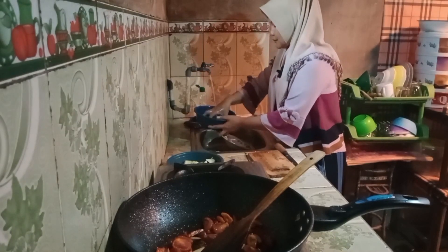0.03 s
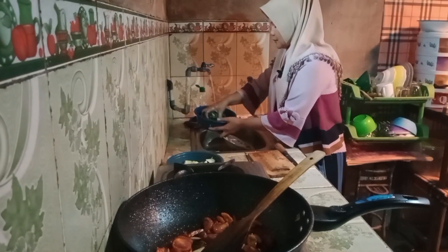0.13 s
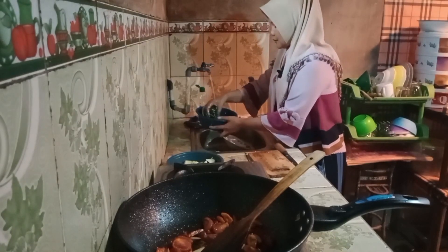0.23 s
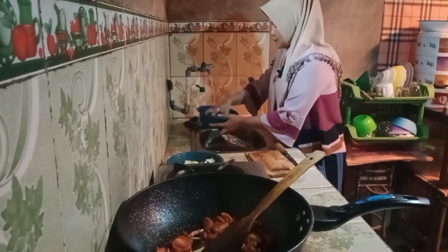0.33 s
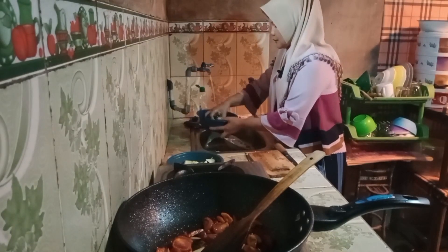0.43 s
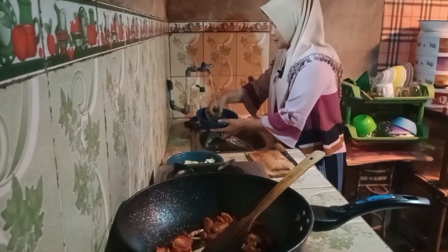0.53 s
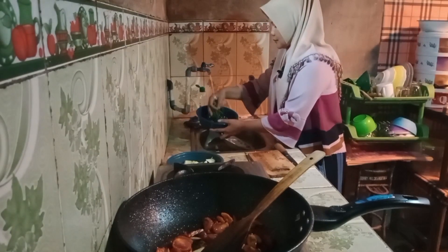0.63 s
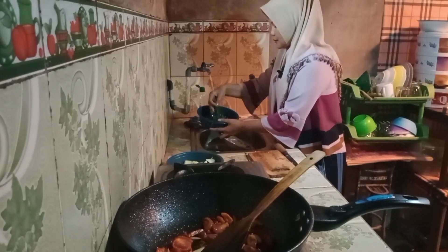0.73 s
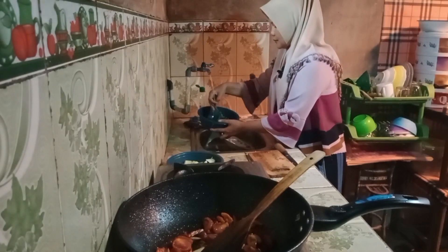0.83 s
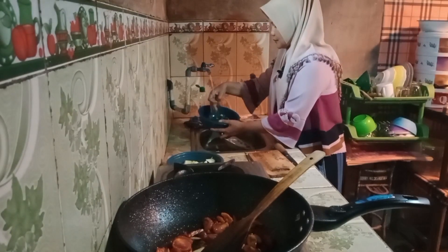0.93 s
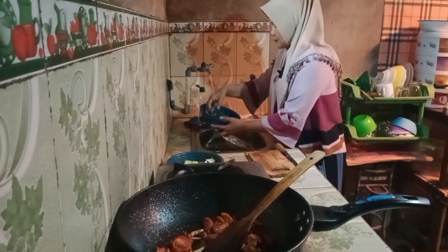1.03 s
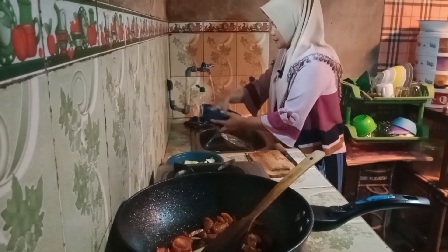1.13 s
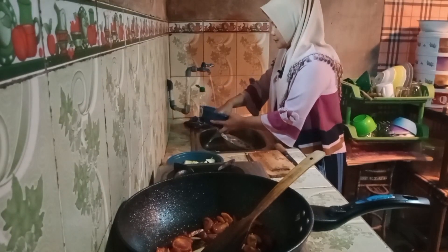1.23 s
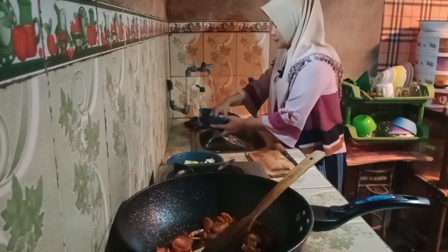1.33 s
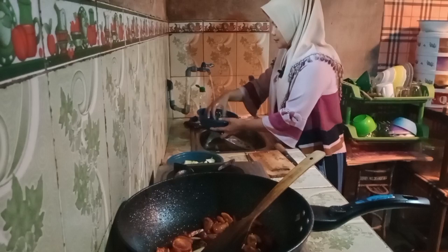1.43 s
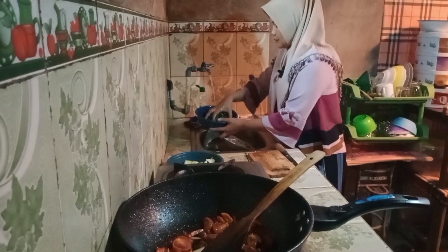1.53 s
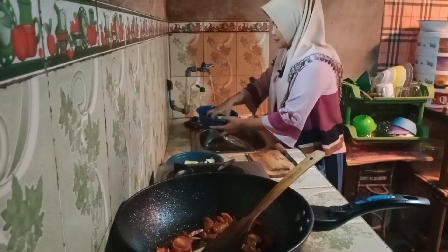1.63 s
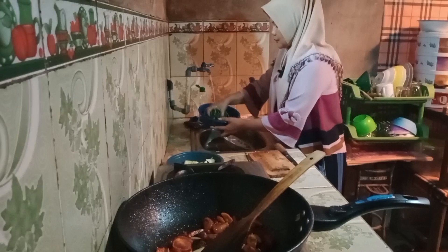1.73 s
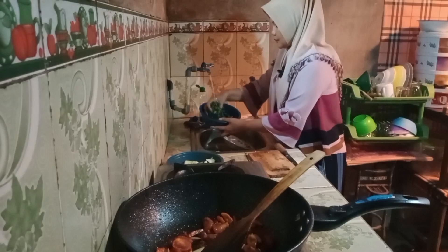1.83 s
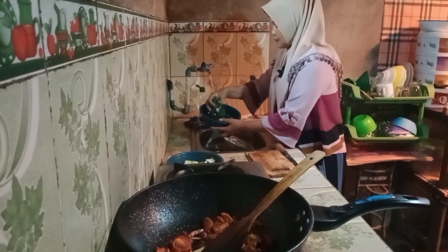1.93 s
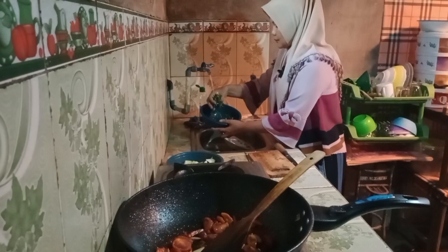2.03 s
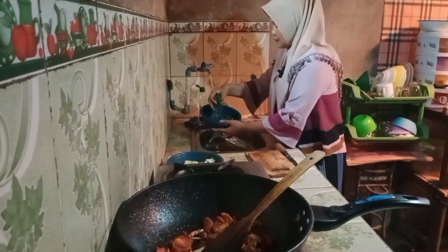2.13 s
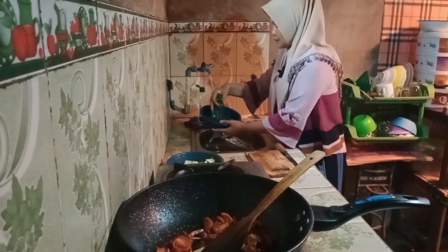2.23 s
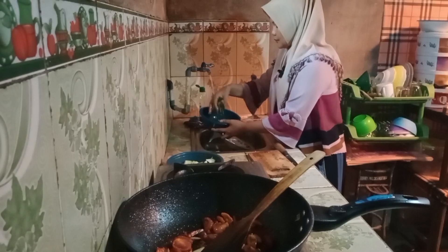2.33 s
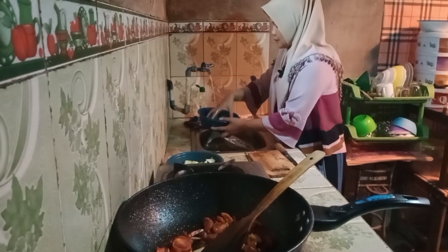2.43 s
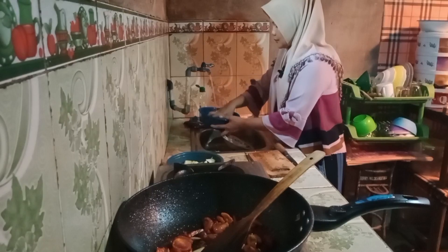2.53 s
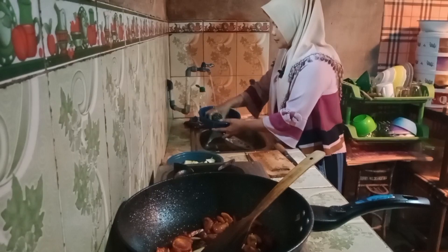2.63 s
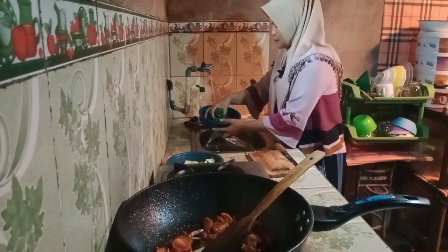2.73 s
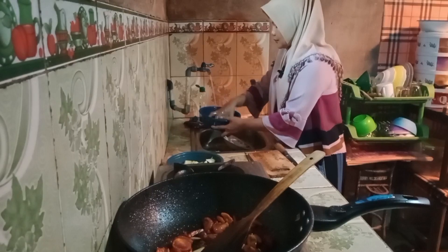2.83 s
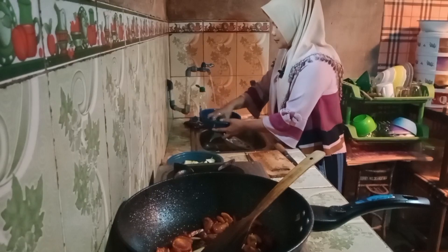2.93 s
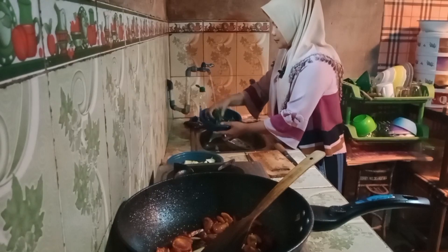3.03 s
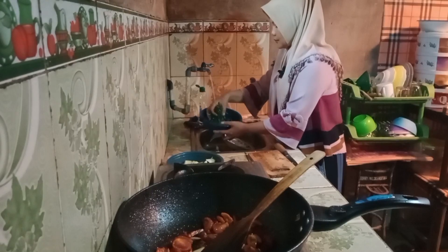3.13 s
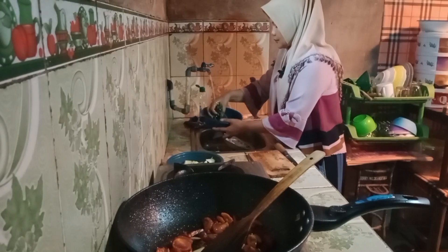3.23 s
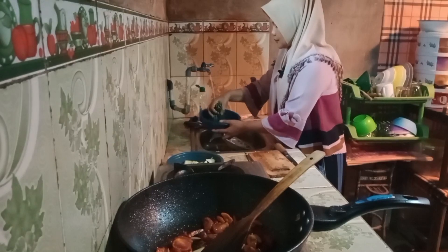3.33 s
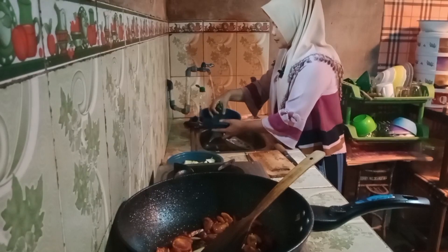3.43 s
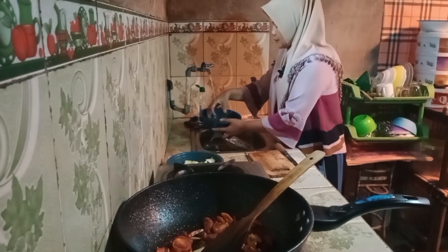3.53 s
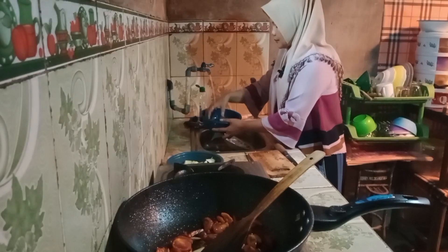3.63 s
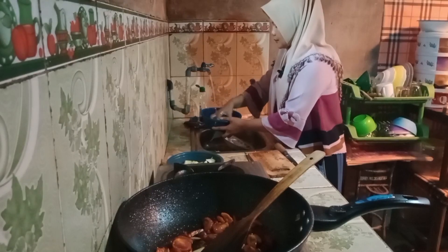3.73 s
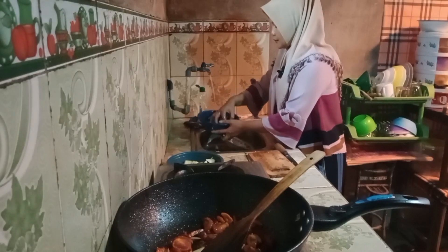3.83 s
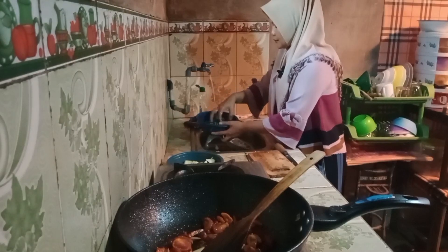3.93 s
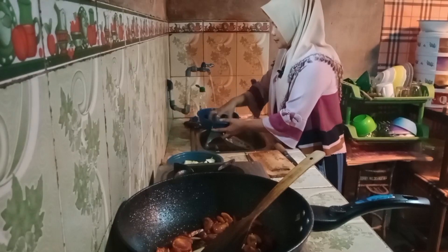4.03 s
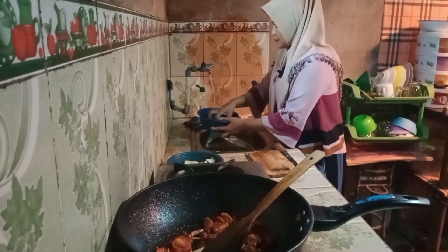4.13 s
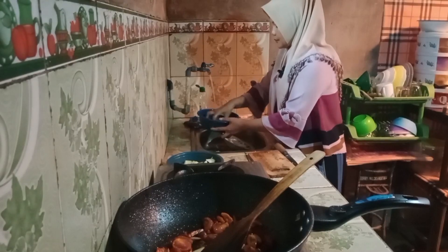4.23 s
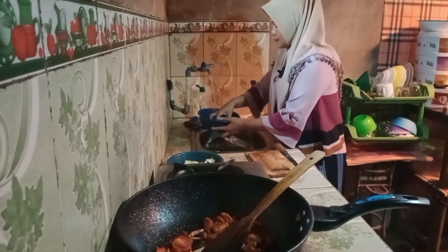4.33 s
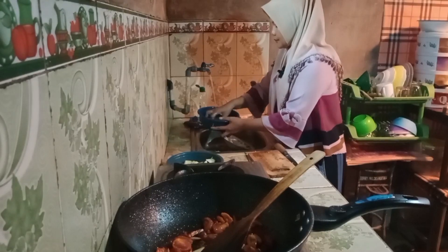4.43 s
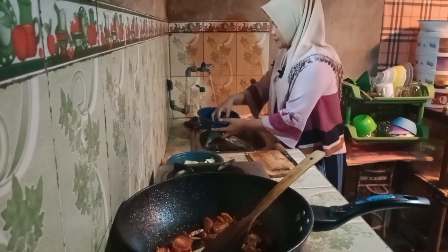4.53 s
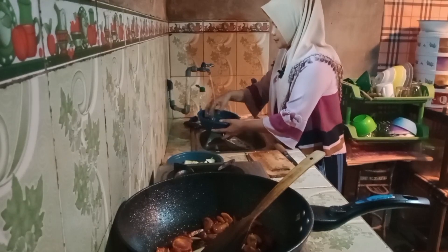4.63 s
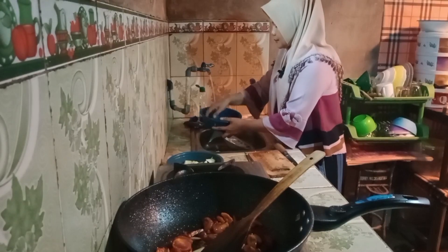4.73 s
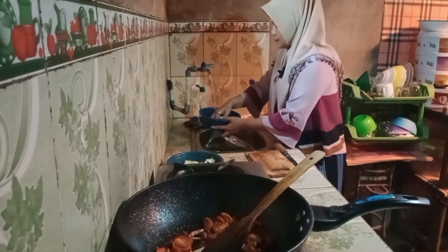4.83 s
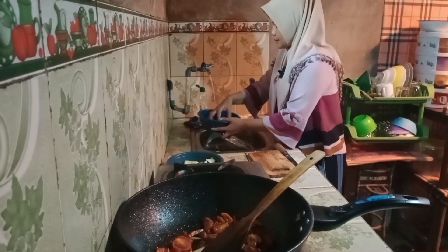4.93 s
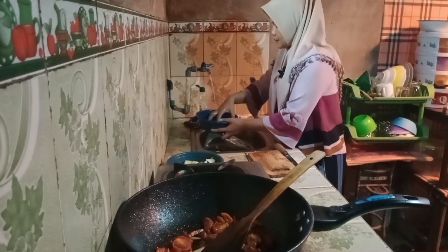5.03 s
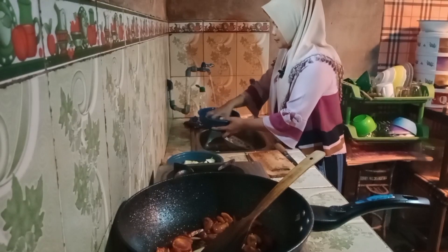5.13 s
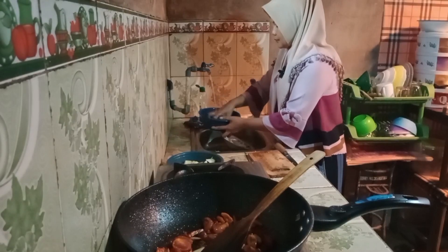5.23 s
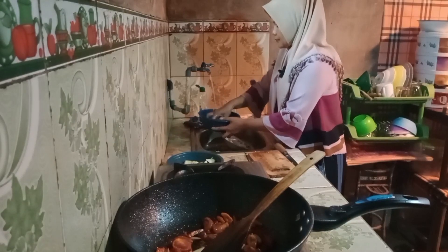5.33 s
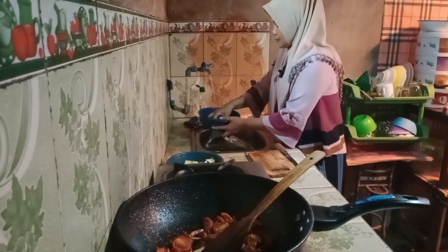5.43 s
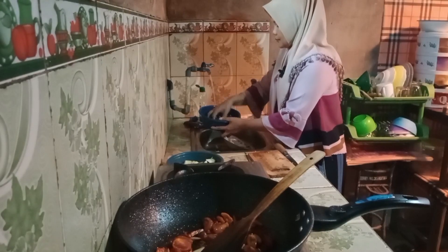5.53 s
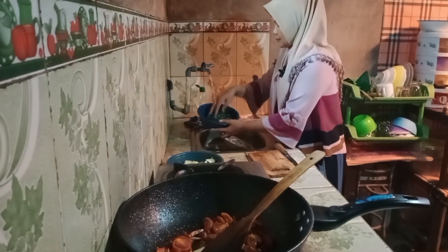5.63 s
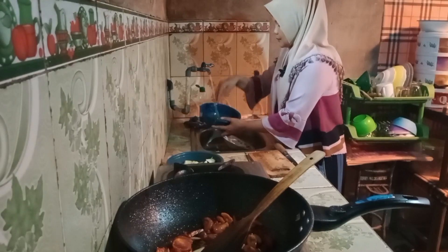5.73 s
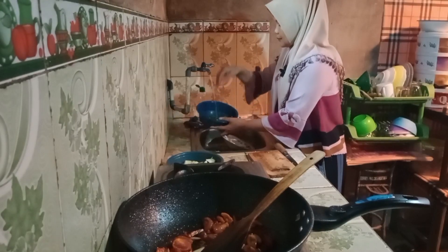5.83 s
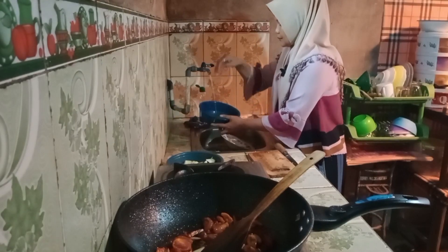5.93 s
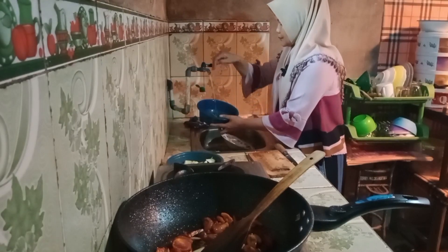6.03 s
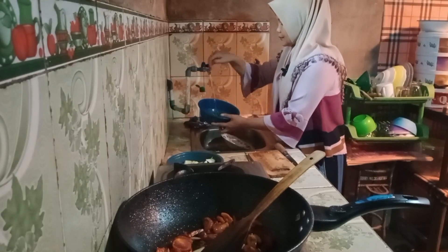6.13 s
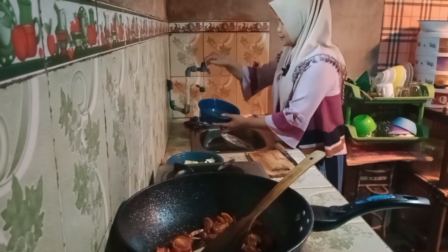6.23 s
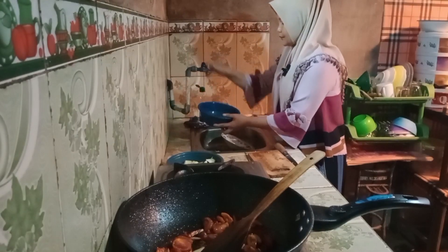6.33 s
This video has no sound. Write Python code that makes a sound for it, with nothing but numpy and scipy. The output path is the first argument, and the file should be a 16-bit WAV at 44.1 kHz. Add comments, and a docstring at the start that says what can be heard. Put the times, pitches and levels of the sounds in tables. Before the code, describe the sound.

Vegetables are washed by hand in a plastic bowl over a metal sink. Quick hollow knocks, gurgling rubs and plops come densely at first, then in looser bursts with small splashes and soft low booms from the sink. After four seconds the water is tipped out in several gushes, the first hissing on steel. A few faint drips end it. Close-sounding, small tiled room with short bright echo.

```python
"""Vegetables are washed by hand in a plastic bowl over a steel sink in a small tiled kitchen.
Skins stick and slip (clicks, gurgles) and knock (thuds, plops) on the bowl, whose modes ring on.
Water is swarms of bubbles and ticks, with slaps, drips and squirts between the fingers; wet skin whistles.
The sink booms softly when pressed: noise through its lowest modes. Towards the end the water is tipped
out in a few gushes, the first of which hisses on the steel. Tile echo and faint room noise surround it."""
import sys
import numpy as np
from scipy import signal
from scipy.fft import rfft, irfft
from scipy.io import wavfile
from scipy.ndimage import uniform_filter1d, map_coordinates

SR = 44100
rng = np.random.default_rng(int(sys.argv[2]) if len(sys.argv) > 2 else 0)


def wav_record(signal):
    """Record a signal, one row per channel, as 16-bit PCM in the file named by sys.argv[1]."""
    frames = np.transpose(np.atleast_2d(signal))
    bounded = np.clip(frames, -1, 1)
    # unit amplitude maps onto the largest positive 16-bit level
    quanta = np.round(bounded * 32767).astype(np.int16)
    wavfile.write(sys.argv[1], SR, quanta)


N = 281799
TIME = np.arange(N) / SR
BINS_HZ = np.fft.rfftfreq(4096, 1 / SR)

# Strokes of the hand round the bowl. Each row: start in seconds, length in seconds,
# relative rubbing level in dB, relative splash level in dB, air pocket pitch in Hz.
STROKES = [(0, 0.013, -17, -39.5, 669), (0.085, 0.28, -25.5, -51.5, 676), (0.16, 0.18, -19.5, -42, 641),
           (0.374, 0.38, -30.5, -59, 611.4), (0.504, 0.17, -22, -43, 580),
           (0.821, 0.087, -41.5, -59.5, 670), (0.933, 0.083, -28, -46.5, 710),
           (1.285, 0.15, -46, -46.5, 702), (1.431, 0.029, -37, -55, 585), (1.554, 0.072, -43, -77, 486),
           (1.66, 0.039, -33, -52, 930), (1.765, .13, -37, -58, 850), (1.887, 0.072, -38.5, -43.5, 622),
           (2.071, 0.031, -42.5, -62, 708), (2.186, 0.11, -32.5, -51.5, 670),
           (2.416, 0.087, -23.5, -46, 643), (2.642, 0.093, -29, -41.5, 690), (2.74, 0.12, -27, -38, 748),
           (2.874, 0.041, -31, -51.5, 690), (3.055, 0.066, -31.5, -45, 750), (3.114, 0.11, -26.5, -36, 764),
           (3.278, .1, -38.5, -49, 480), (3.357, 0.12, -33, -54.5, 507), (3.565, 0.029, -24.5, -41.5, 720),
           (3.622, 0.13, -50, -51, 655), (3.793, 0.037, -47.5, -49.5, 627), (3.906, 0.22, -48.5, -57, 650),
           (4.16, 0.33, -52.5, -53.5, 656)]
# Gushes as the bowl is tipped out. Each row: start in seconds, length in seconds, relative gurgling level
# in dB, relative splash level in dB, air pocket pitch in Hz, relative spray level in dB.
GUSHES = [(4.268, .1, -40.5, -37.5, 950, -37.5), (4.378, 0.21, -34.5, -36.5, 542, -46.5),
          (4.612, 0.12, -40, -35.5, 948, -48.5), (4.776, 0.069, -50.5, -59, 767, -73),
          (4.926, 0.096, -47, -55, 690, -57.5), (5.054, 0.034, -47, -47.5, 707, -56.5),
          (5.255, 0.147, -28.5, -37.5, 972, -49.5), (5.44, 0.092, -36, -41, 690, -56.5),
          (5.604, 0.066, -44, -48, 840, -58)]
# Spectrum of a blow on the bowl. Each row: frequency in Hz, relative level in dB.
THUD = [(60, -37.5), (150, -25.5), (280, -13), (400, -6.5), (660, -1), (950, -3.5), (1200, -13),
        (1550, -29), (2150, -24.5), (3000, -63.5), (4500, -100), (12000, -83)]
# Spectrum of splashing water. Each row: frequency in Hz, relative level in dB.
SPLASH = [(150, -7.5), (500, -2), (1100, 5), (1600, 3), (2200, 8.5), (2800, -3), (3700, -21), (5000, -32.5),
          (9000, -48), (16000, -64.5)]
# Spectrum of fine spray. Each row: frequency in Hz, relative level in dB.
SPRAY = [(1200, -22), (3000, 7), (4500, 5), (7200, 3), (9000, -6.5), (12000, -6), (15500, -4.5)]


def gain_of(db):
    """Decibels to an amplitude factor."""
    return 10 ** (np.asarray(db) / 20)


def evened(x):
    """Scales to rms 1."""
    return x / np.sqrt(np.mean(x ** 2) + 1e-20)


def steadied(x, size):
    """Unit power over stretches of about size samples; the finer grain stays."""
    power = uniform_filter1d(uniform_filter1d(x ** 2, size), size // 2)
    return x / np.sqrt(abs(power) + np.mean(x ** 2) / 1000)


def read(points, hz):
    """Interpolates a spectrum table on a log-frequency axis."""
    f, value = np.transpose(points)
    return np.interp(np.log(hz + 1), np.log(f + 1), value)


def track(curve, column):
    """One column of a curve, interpolated for every sample."""
    rows = np.array(curve)
    return np.interp(TIME, rows[:, 0], rows[:, column])


def add(mix, s, sound):
    """Adds a sound at s seconds, cut at the scene's end."""
    part = mix[max(round(s * SR), 0):][:len(sound)]
    part += sound[:len(part)]


def through(x, taps):
    """Convolves and keeps the scene's length."""
    return signal.oaconvolve(x, taps)[:N]


def pulse(spectrum, shift=1):
    """Minimum-phase pulse with this spectrum moved up by a factor; peak 1."""
    log_gain = np.log(gain_of(read(spectrum, BINS_HZ / shift)))
    circle = np.concatenate([log_gain, log_gain[-2:0:-1]])
    min_phase = np.exp(np.conj(signal.hilbert(circle)))
    taps = np.fft.ifft(min_phase).real[:len(BINS_HZ)]
    return taps / abs(taps).max()


def resonate(x, hz, width_hz):
    """One-pole resonance of gain 1, run at baseband, at a fixed or moving pitch."""
    turn = np.exp(2j * np.pi * np.cumsum(hz * np.ones(len(x))) / SR)
    r = np.exp(-np.pi * width_hz / SR)
    baseband = signal.lfilter([1 - r], [1, -r], x / turn + 1e-18)
    return 2 * (turn * baseband).real


def drifting(x, depth_db, frames=9, size=3):
    """The hands keep changing the hollows the sound comes from: broad bands swell and fade at random."""
    hz, t, z = signal.stft(x, SR, nperseg=512)
    field = rng.standard_normal((64, len(t)))
    field = uniform_filter1d(field, size, 0)
    field = evened(uniform_filter1d(field, int(frames), 1))
    band = np.clip(7 * np.log2(1 + hz / 100), 0, 63)
    grid = np.meshgrid(band, np.arange(len(t)), indexing="ij")
    field = map_coordinates(field, grid, order=1)
    return signal.istft(z * gain_of(depth_db * field), SR, nperseg=512)[1][:N]


def movements(rows, column, attack_s, sag_db_per_s, release_db_per_s, lapping_db):
    """Level of a run of movements: each swells, sags while it lasts, dies quickly, leaves the water lapping."""
    lapping_db_per_s = 37.5
    t, power = TIME[::64], 0
    for row in rows:
        age = np.maximum(t - row[0], 0)
        after = np.maximum(age - row[1], 0)
        main = gain_of(-sag_db_per_s * age - release_db_per_s * after)
        lapping = gain_of(lapping_db - lapping_db_per_s * age)
        swell = np.minimum(age / attack_s, 1)
        power = power + (gain_of(row[column]) * swell * np.maximum(main, lapping)) ** 2
    return np.interp(TIME, t, np.sqrt(power))


def clicks(per_s, spread_db):
    """Random clicks of either sign: many small, a few large."""
    size = gain_of(spread_db * np.minimum(rng.exponential(1, N), 4))
    return size * rng.choice([-1, 1], N) * (rng.random(N) < per_s / SR)


def bubble(hz, cycles, rise):
    """A trapped air pocket decays by 1/e in this many cycles at hz and rises in pitch as it surfaces."""
    age = np.arange(0, 6, hz / (cycles * SR))  # in decay times
    phase = 2 * np.pi * cycles * (age + rise * age ** 2 / 2)
    return np.exp(-age) * np.sin(phase) / np.sqrt(len(age))


def plink(hz, cycles, rise):
    """One clear bubble that swells over its first cycle; peak 1."""
    ring = bubble(hz, cycles, rise)
    cycle = np.minimum(np.arange(len(ring)) * hz / SR, 1)
    ring = ring * np.sin(np.pi / 2 * cycle) ** 2
    return ring / abs(ring).max()


def water(low_hz, high_hz, per_s, spread_db, cycles, rise, tick_share):
    """A swarm of bubbles, each of its own size, among the sharp ticks of landing drops."""
    swarm = np.zeros(N)
    for s, pitch, rarity, ring, side in rng.random((round(per_s * N / SR), 5)):
        size = np.sign(side - .5) * gain_of(spread_db * min(-np.log(1 - rarity), 4))
        hz = low_hz * (high_hz / low_hz) ** pitch
        add(swarm, s * N / SR, size * bubble(hz, cycles * (0.16 + 3.9 * ring), rise))
    return evened(swarm) + tick_share * evened(clicks(per_s, spread_db))


def pocket_pitch():
    """The air pocket in the water glides from the pitch of one movement to that of the next."""
    return track([(row[0] + row[1] / 2, row[4]) for row in STROKES + GUSHES], column=1)


def rubbing(slips_per_s, spread_db, pocket_width_hz, pocket_db):
    """Skins stick and slip on wet plastic among gurgling bubbles; the air pocket under the hand colours both."""
    gurgle = water(358.8, 1150, per_s=100, spread_db=3, cycles=6.5, rise=0.045, tick_share=0)
    slips = through(evened(clicks(slips_per_s, spread_db)), pulse(THUD))
    gurgle = through(gurgle, pulse(THUD))
    slosh = evened(slips) + gain_of(-1.5) * evened(gurgle)
    slosh = drifting(slosh, depth_db=6.0, frames=6)
    hz = pocket_pitch()
    pocket = resonate(resonate(slosh, hz, pocket_width_hz), hz, pocket_width_hz)
    effort = movements(STROKES + GUSHES, column=2, attack_s=0.01, sag_db_per_s=18.5,
                       release_db_per_s=295, lapping_db=-19.5)
    return steadied(slosh + gain_of(pocket_db) * pocket, size=1500) * effort


def bowl(x, ring_db):
    """The bowl and basin ring on after each touch, as a bank of decaying modes."""
    # Each row: frequency in Hz, 60 dB decay time in seconds, relative level in dB.
    bowl_modes = [(300, 0.28, -8), (391.6, 0.2, 4.5), (480, 0.16, 4), (746, .16, -15), (958, 0.15, 4.5),
                  (1006.5, 0.062, -2.5), (1271.4, 0.14, 3)]
    ring = 0
    for hz, t60_s, db in bowl_modes:
        width_hz = np.log(1000) / np.pi / t60_s
        ring = ring + gain_of(db) * resonate(x, hz, width_hz)
    return x + gain_of(ring_db) * ring


def splashing():
    """Churned bubbles and drops, coloured by the cupped hand in a stroke and open in a gush."""
    # Colour of the cupped hand. Each row: frequency in Hz, relative level in dB.
    cupped = [(300, 8), (900, -2.5), (1550, -5.5), (2200, -2), (2800, -0.5), (3900, -2), (7000, 0)]
    swarm = water(700, 3800, per_s=1500, spread_db=4.0, cycles=5.8, rise=0.03, tick_share=1.0)
    swarm = drifting(through(swarm, pulse(SPLASH)), depth_db=4.5)
    thrown = movements(STROKES, column=3, attack_s=0.038, sag_db_per_s=23.0,
                       release_db_per_s=259.5, lapping_db=-21)
    poured = movements(GUSHES, column=3, attack_s=0.016, sag_db_per_s=26.5,
                       release_db_per_s=319, lapping_db=-27.5)
    in_hand = steadied(through(swarm, pulse(cupped)), size=1600)
    return in_hand * thrown + steadied(swarm, size=1600) * poured


def squirts(swarm):
    """Each squirt is a short puff of fine bubbles, pitched by the gap between the fingers."""
    # Each row: start in seconds, length in seconds, relative level in dB, brightest pitch in Hz.
    squirt_rows = [(0, 0.017, -62, 6430), (0.54, 0.096, -52.5, 2400), (0.713, 0.12, -64.5, 6470),
                   (1.277, 0.071, -61, 7350), (1.306, 0.088, -54, 2950), (1.86, 0.07, -53, 4060),
                   (2.048, 0.036, -48.5, 6600), (2.185, 0.18, -69, 5450), (2.692, 0.12, -52, 5400),
                   (3.062, 0.12, -68, 5500), (3.283, 0.086, -70.5, 7000), (3.288, 0.08, -53.5, 2520),
                   (3.748, 0.049, -67, 8740), (3.836, 0.094, -64.5, 8200), (3.9, 0.039, -57, 4330),
                   (4.005, 0.026, -49, 3600), (4.203, 0.042, -44, 3600), (4.23, 0.12, -50, 7000),
                   (4.393, 0.068, -58.5, 6900), (4.545, 0.18, -63.5, 6540), (4.602, .04, -54, 4100),
                   (4.786, 0.041, -68, 6500), (4.957, 0.048, -61, 5000), (5.232, .12, -52.5, 3030),
                   (6.315, .03, -72, 6000)]
    width_octaves, skirt_db, usual_hz = .33, -15.5, 7000
    out, bins_hz = np.zeros(N), np.fft.rfftfreq(SR // 2, 1 / SR)
    for row in squirt_rows:
        start_s, hz = row[0], row[3]
        first = max(round(start_s * SR), 0)
        # low-pitched squirts carry less fine mist
        mist = gain_of(skirt_db) * (hz / usual_hz) ** 2 * gain_of(read(SPRAY, bins_hz))
        peak = np.exp(-.5 * (np.log2((bins_hz + 1) / hz) / width_octaves) ** 2)
        puff = irfft(rfft(swarm[first:], SR // 2) * (mist + peak), SR // 2)
        puff = steadied(puff, size=2000)
        force = movements([row], column=2, attack_s=0.029, sag_db_per_s=16,
                          release_db_per_s=278, lapping_db=-27)
        force = force[first:][:len(puff)]
        add(out, start_s, puff[:len(force)] * force)
    return out


def spraying(hiss_db):
    """Fine spray squirts, strokes leave a little froth, gushes throw coarser drops over a dense hiss."""
    # Coarser drops of a gush. Each row: frequency in Hz, relative level in dB.
    coarse_spectrum = [(1200, -11.5), (2800, 8), (3900, 5.5), (5500, -11.5), (7500, -7.5), (9500, -21),
                       (15500, -36.5)]
    swarm = water(2600, 14000, per_s=900, spread_db=2.5, cycles=7.7, rise=.012, tick_share=1.0)
    swarm = evened(drifting(swarm, depth_db=4.5, frames=10))
    fine = steadied(through(swarm, pulse(SPRAY)), size=2400)
    hissing = swarm + gain_of(hiss_db) * rng.standard_normal(N)
    coarse = steadied(through(hissing, pulse(coarse_spectrum)), size=2400)
    froth = gain_of(-26.0) * movements(STROKES, column=3, attack_s=0.02, sag_db_per_s=11.0,
                                       release_db_per_s=121.5, lapping_db=-21)
    poured = movements(GUSHES, column=5, attack_s=0.023, sag_db_per_s=56.5,
                       release_db_per_s=283, lapping_db=-33.5)
    return squirts(swarm) + fine * froth + coarse * poured


def squeaks(width_hz):
    """Wet skin and squeezed air whistle: noise through a narrow resonance that glides in pitch."""
    # Each row: start in seconds, length in seconds, start pitch in Hz, end pitch in Hz, level in dB.
    squeak_rows = [(0, 0.21, 3310, 2710, -60), (0.814, 0.13, 2400, 2300, -57.5),
                   (1.082, .16, 3510, 3920, -61.5), (1.742, 0.31, 890, 976, -38),
                   (1.914, 0.11, 850, 480, -41), (2.972, 0.13, 960, 930, -42),
                   (3.952, 0.15, 5930, 5160, -60.5)]
    out = np.zeros(N)
    for s, length_s, start_hz, end_hz, db in squeak_rows:
        hiss = rng.standard_normal(SR)[:int(length_s * SR)]
        hz = np.linspace(start_hz, end_hz, len(hiss))
        tone = resonate(resonate(hiss, hz, width_hz), hz, width_hz)
        add(out, s, gain_of(db) * evened(tone) * np.hanning(len(tone)))
    return out


def boom(hz, width_hz, rumble_db, upper_hz=152, upper_db=-21):
    """The two lowest modes of the sink floor, over a dull rumble of handling."""
    # The hands lean on the bowl and the sink flexes.
    # Each row: start in seconds, length in seconds, level in dB.
    presses = [(.89, .24, -48.5), (1.615, .22, -35), (2.27, .2, -41.5), (2.62, 0.039, -38.5),
               (2.875, .11, -35), (3.02, 0.11, -39), (3.125, 0.074, -32.5), (3.71, .09, -46.5),
               (3.87, 0.11, -41.5), (4.6, 0.11, -45)]
    # the weight of the bowl keeps the sink stirring until it is lifted
    resting_db, lift_s, lift_db_per_s = -59, 5.44, 33.5
    tone = resonate(resonate(rng.standard_normal(N), hz, width_hz), hz, width_hz)
    tone = steadied(tone, size=3000)
    upper = evened(resonate(resonate(rng.standard_normal(N), upper_hz, 26), upper_hz, 26))
    lowpass = signal.butter(3, 72, fs=SR, output="sos")
    rumble = evened(signal.sosfilt(lowpass, rng.standard_normal(N)))
    resting = gain_of(resting_db - lift_db_per_s * np.maximum(TIME - lift_s, 0))
    pressing = movements(presses, column=2, attack_s=0.065, sag_db_per_s=4.0,
                         release_db_per_s=232.0, lapping_db=-23)
    push = np.hypot(resting, pressing)
    modes = (tone + gain_of(upper_db) * upper) * push
    return modes + gain_of(rumble_db) * rumble * np.sqrt(push * push.mean())


def air():
    """The faint steady noise of the room: shaped Gaussian noise."""
    # Each row: frequency in Hz, relative level in dB.
    air_spectrum = [(25, -8.5), (80, -14.5), (200, -20), (800, -27.5), (1500, -34), (7000, -31),
                    (15000, -35)]
    level_db = -73.5
    hz = np.fft.rfftfreq(N, 1 / SR)
    spectrum = rfft(rng.standard_normal(N)) * gain_of(read(air_spectrum, hz))
    return gain_of(level_db) * evened(irfft(spectrum, N))


def knocks(thud_db, plop_db, cycles):
    """Each blow of vegetables or water lumps is a hollow thud and the plop of a trapped air pocket."""
    # Each row: time in seconds, relative level in dB, plop pitch in Hz.
    knock_rows = [(.013, -5, 637), (.084, -8.5, 715), (.109, -12.5, 745), (.121, -10, 548),
                  (.145, -11, 640), (.192, -7.5, 674), (.203, -0.5, 714), (.2115, -8, 705),
                  (0.2397, -6, 840), (.248, -16.5, 815), (.315, -6.5, 650), (.342, -1.5, 676),
                  (.463, -14.5, 700), (.478, -12, 722), (.519, -10, 553), (.532, -7, 602), (.544, -9, 620),
                  (.558, -15, 600), (.597, -16.5, 645), (.608, -11, 670), (.641, -13, 956),
                  (.655, -10.5, 633), (.671, -7, 740), (.764, -12.5, 654), (.933, -21.5, 940),
                  (.983, -14, 687), (1.006, -16.5, 668), (1.324, -25, 1016), (1.567, -34, 412),
                  (1.677, -11, 896), (1.925, -12.5, 710), (1.943, -14.5, 747), (1.977, -18, 532),
                  (2.195, -20, 760), (2.424, 0.5, 650), (2.483, -5.5, 650), (2.62, -22, 367),
                  (2.654, -20, 687), (2.664, -7.5, 667), (2.751, -11, 730), (2.799, -11.5, 762),
                  (2.83, -7, 673), (3.063, -18, 757), (3.099, -10.5, 800), (3.135, -15, 660),
                  (3.178, -19, 540), (3.197, -19.5, 680), (3.381, -24.5, 494), (3.411, -20.5, 750),
                  (3.577, -12, 800), (5.274, -18.5, 964), (5.328, -16.5, 940), (5.378, -15.5, 643)]
    out, thud = np.zeros(N), pulse(THUD)
    for s, db, hz in knock_rows:
        plop = signal.fftconvolve(bubble(hz, cycles, rise=0.0061), thud)
        add(out, s, gain_of(db + thud_db) * thud)
        add(out, s - .5 / hz, gain_of(db + plop_db) * plop / abs(plop).max())
    return out


def slaps(usual_hz, bubble_db, spatter_s, spatter_share):
    """A lump of water lands, breaks into a quick spatter and leaves a ringing bubble."""
    # Each row: time in seconds, relative level in dB, pitch in Hz.
    slap_rows = [(.12, -33, 2060), (.239, -24, 2120), (.51, -39.5, 2540), (.532, -18.5, 2220),
                 (1.679, -31.5, 1520), (1.343, -32.5, 2200), (2.087, -33, 2300), (2.47, -29.5, 2050),
                 (2.764, -34.5, 5740), (3.099, -28.5, 2200), (3.144, -14.5, 1950), (3.577, -27.5, 2200),
                 (3.906, -39.5, 2530), (3.92, -39, 2180), (4.034, -35, 2200), (4.295, -27.5, 1220),
                 (4.334, -21.5, 1470), (4.405, -21, 2160), (4.454, -23, 1560), (4.659, -24, 1540),
                 (4.717, -26, 2150), (4.949, -33.5, 2500), (4.982, -27, 2110), (5.243, -38, 2260),
                 (5.357, -20.5, 2170)]
    out, t = np.zeros(N), TIME[:SR // 20]
    for s, db, hz in slap_rows:
        spray = rng.standard_normal(len(t)) * np.exp(-t / spatter_s)
        spatter = (t == 0) + spatter_share * spray
        slap = signal.fftconvolve(spatter, pulse(SPLASH, hz / usual_hz))
        add(out, s, gain_of(db) * slap / abs(slap).max())
        add(out, s, gain_of(db + bubble_db) * plink(hz, cycles=5.2, rise=0.015))
    return out


def drips(ring_s, rise):
    """A drop lands and leaves one ringing bubble, whose decay time is ring_s at any pitch."""
    # Each row: time in seconds, relative level in dB, pitch in Hz.
    drip_rows = [(.751, -48, 7800), (.787, -46, 5600), (2.762, -35, 5560), (2.801, -34, 7000),
                 (2.83, -29, 2290), (4.105, -49, 7100), (4.439, -40, 6700), (4.458, -40, 7500),
                 (4.645, -36.5, 4150), (4.951, -29, 2700), (4.982, -32, 2200), (5.083, -44, 2200),
                 (6.145, -65, 2460), (6.19, -58, 950), (6.265, -57.5, 2500), (6.326, -58.5, 2570)]
    out = np.zeros(N)
    for s, db, hz in drip_rows:
        add(out, s, gain_of(db) * plink(hz, hz * ring_s, rise))
    return out


def pouring():
    """A thin sheet of water hisses on the steel and excites its high modes."""
    # Level of the sheet. Each row: time in seconds, level in dB.
    sheet = [(4.19, -82.5), (4.23, -44), (4.27, -32), (4.31, -36.5), (4.36, -44.5), (4.42, -66)]
    # Ringing of the steel. Each row: frequency in Hz, width in Hz, relative level in dB.
    steel_modes = [(2730, 110, -4.5), (3500, 180, 1.5), (3980, 90, -0.5), (4930, 280, 12), (5120, 45, 8),
                   (10000, 130, -6.5)]
    ring = sum(gain_of(db) * resonate(rng.standard_normal(N), hz, width_hz)
               for hz, width_hz, db in steel_modes)
    ring = signal.sosfilt(signal.butter(1, 9000, fs=SR, output="sos"), ring)
    running = (TIME > sheet[0][0]) * (TIME < sheet[-1][0])
    return steadied(ring, size=2000) * gain_of(track(sheet, column=1)) * running


def kitchen(x, first_s):
    """Dense reflections from the tiles, each band dying at its own speed."""
    # Each row: frequency in Hz, 60 dB decay time in seconds.
    decay_times = [(200, 0.43), (700, 0.15), (2000, 0.24), (5000, 0.31), (12000, 0.17)]
    taps = rng.choice([-1., 1.], SR // 2) * (rng.random(SR // 2) < 1 / 12)
    hz, t, z = signal.stft(taps, SR, nperseg=256)
    decay = gain_of(-60 * t / read(decay_times, hz)[:, None])
    tail = signal.istft(z * decay, SR, nperseg=256)[1]
    tail *= np.arange(len(tail)) > first_s * SR
    return through(x, tail / np.linalg.norm(tail))


def scene():
    """Blows, rubbing and splashing ring the bowl; all but the boom and air echo in the kitchen."""
    blows = bowl(knocks(thud_db=-19.0, plop_db=-4.0, cycles=2.39), ring_db=2)
    rub = rubbing(slips_per_s=340, spread_db=4.0, pocket_width_hz=390, pocket_db=0.0)
    rub = gain_of(-3.0) * bowl(rub, ring_db=-1.0)
    wet = gain_of(0.5) * bowl(splashing(), ring_db=1.5)
    wet += gain_of(-0.5) * spraying(hiss_db=2.5)
    wet += gain_of(-2.0) * slaps(usual_hz=2200, bubble_db=-8.0, spatter_s=0.013, spatter_share=0.13)
    tones = pouring() + squeaks(width_hz=170) + gain_of(-2) * drips(ring_s=0.0025, rise=0.012)
    sent = gain_of(-5.5) * blows + gain_of(-9.0) * rub + gain_of(-11.5) * (wet + tones)
    echo = kitchen(sent, first_s=0.0039)
    sink = boom(hz=68.76, width_hz=4.7, rumble_db=-3.5)
    return (blows + rub + wet + tones + echo + sink + air())[None]


def record(dry):
    """Limits the band with a steep linear-phase low-pass."""
    edge_hz = 15550
    lowpass = signal.firwin(511, edge_hz, window=("kaiser", 9), fs=SR)
    return signal.oaconvolve(dry, lowpass[None], "same")


dry = scene()
out = record(dry)
wav_record(out)
```